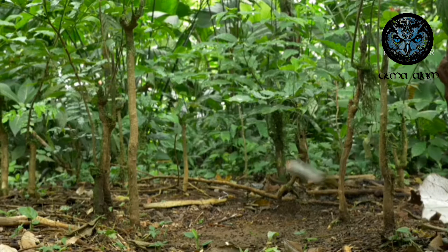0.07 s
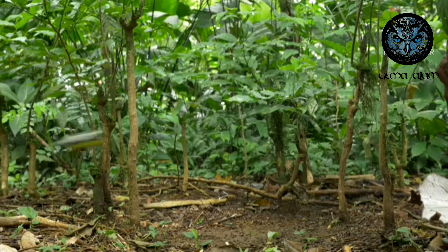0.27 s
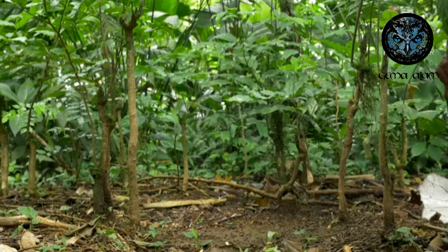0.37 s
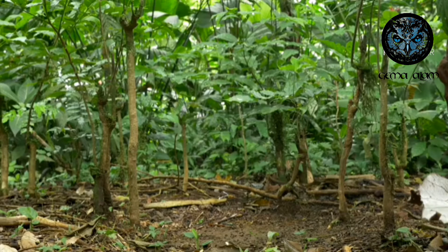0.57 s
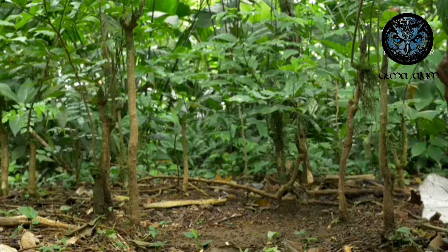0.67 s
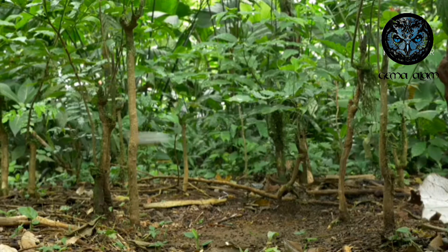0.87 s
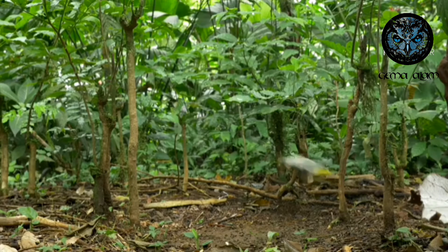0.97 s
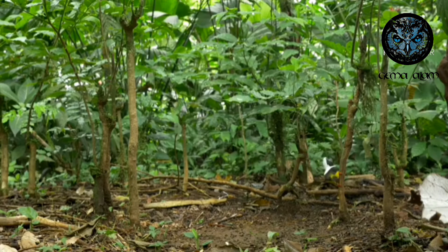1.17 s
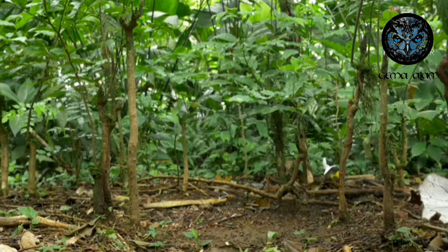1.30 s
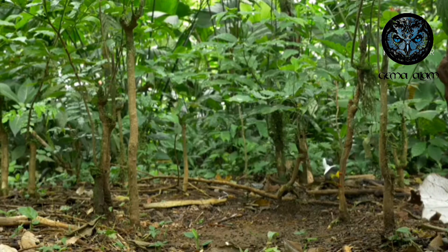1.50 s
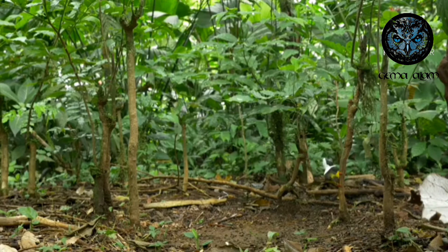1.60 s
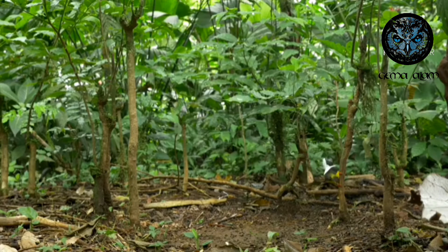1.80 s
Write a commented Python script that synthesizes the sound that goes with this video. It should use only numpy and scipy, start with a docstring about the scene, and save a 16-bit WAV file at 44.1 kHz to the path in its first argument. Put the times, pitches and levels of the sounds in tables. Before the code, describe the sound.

A small bird snaps its wings twice, chirping once between, over faint rainforest ambience.

```python
"""Low rainforest hum and leaf hiss, with an animal piping soft notes far off to the right. Close to the
stereo microphone a manakin leaps between saplings: two hard wing snaps, a rising chirp before the second,
and small scuffs as it lands. In each snap the wings clap, their shafts ring and the pushed air thumps;
trunks and leaves scatter it into a bright tail. Late on, an insect's thin tone and a soft rush swell in."""
import sys
import numpy as np
from scipy import signal
from scipy.fft import rfft, irfft, next_fast_len
from scipy.io import wavfile
from scipy.ndimage import uniform_filter1d, map_coordinates

SR = 44100
rng = np.random.default_rng(int(sys.argv[2]) if len(sys.argv) > 2 else 0)


def unload_audio(sound):
    """Save the sound as a 16-bit wav file, at the path given as the first command line argument."""
    columns = np.transpose(np.atleast_2d(sound))
    # keep every value between -1 and 1, then stretch to whole-number steps
    steps = np.round(np.clip(columns, -1, 1) * 32767)
    wavfile.write(sys.argv[1], SR, steps.astype(np.int16))


N = 81585
TIME = np.arange(N) / SR

# Stereo image of scattered sound and of the ambience. Each row: frequency in Hz, left-right likeness 0-1.
SCATTER_LIKENESS = [(300, 1), (1400, 0.18), (4000, .45), (12000, 0.42)]
AMBIENCE_LIKENESS = [(30, 1), (150, 1), (300, 1), (600, 0.8), (1200, 0.05), (10000, 0.22)]


def amp(db):
    """Decibels to gain."""
    return 10 ** (np.asarray(db) / 20)


def unit(x):
    """Scale to rms 1."""
    return x / np.sqrt(np.mean(x ** 2) + 1e-20)


def along(points, hz):
    """Interpolate (Hz, value) points on a log frequency axis."""
    freqs, values = np.transpose(points)
    return np.interp(np.log(hz + 1), np.log(freqs + 1), values)


def curves(rows):
    """One value per sample for each column after the time."""
    times, *columns = np.transpose(rows)
    return [np.interp(TIME, times, column) for column in columns]


def wobble(rate):
    """A smooth random curve, rate knots a second."""
    return map_coordinates(rng.standard_normal(N // 8), [TIME * rate], mode="mirror")


def fade(t, t60):
    """Exponential decay by 60 dB in t60 seconds."""
    return np.exp(-np.log(1000) * t / t60)


def since(start):
    """Seconds elapsed after start, zero before."""
    return np.maximum(TIME - start, 0)


def pan(x, left_db):
    """Place a sound by how much louder it is on the left than on the right."""
    return x * unit(amp(np.array([[left_db], [-left_db]]) / 2))


def filtered(x, response):
    """Filter x by a gain given as a function of Hz."""
    size = next_fast_len(N + SR // 2)
    return irfft(rfft(x, size) * response(np.fft.rfftfreq(size, 1 / SR)), size)[..., :N]


def noise(spectrum, likeness):
    """Coloured stereo noise of rms 1."""
    def mid_side_gains(hz):
        angle = np.arccos(np.clip(along(likeness, hz), -1, 1)) / 2
        return amp(along(spectrum, hz)) * [np.cos(angle), np.sin(angle)]
    mid, side = filtered(rng.standard_normal((2, N)), mid_side_gains)
    return unit(np.array([mid + side, mid - side]))


def band(hz, half_width_hz):
    """A narrow band of stereo noise of rms 1."""
    white = noise([(1000, 0), (10000, 0)], SCATTER_LIKENESS)
    return unit(filtered(white, lambda f: 1 / (1 + ((f - hz) / half_width_hz) ** 4)))


def forest(colour):
    """Impulse response of energy 1: a quick scatter from near stems, then an uneven tail."""
    # How long the forest rings. Each row: frequency in Hz, t60 in seconds.
    decay_times = [(300, 0.37), (2000, 1), (4000, 0.83), (8000, 0.67), (14000, 0.54)]
    hz, t, bins = signal.stft(noise(colour, SCATTER_LIKENESS), SR, nperseg=256)
    bins = bins * fade(t, along(decay_times, hz)[:, None])
    tail = signal.istft(bins, SR, nperseg=256)[1][:, :N]
    near_stems = 1 + amp(5) * fade(TIME, t60=0.07)
    build_up = 1 - np.exp(-TIME / 0.006)
    uneven_trunks = amp(0.4 * wobble(248))
    return unit(tail * near_stems * build_up * uneven_trunks) / np.sqrt(N)


def echo(x, colour):
    """A call as the forest returns it."""
    return signal.fftconvolve(x[None], forest(colour), axes=1)[:, :N]


def background():
    """Low distant hum, leaf hiss all around and a soft midrange rush near the end."""
    # Spectra of the three layers. Each row: frequency in Hz, relative density in dB.
    hum_colour = [(15, -49), (25, -17), (53, -19), (77, -4), (149, 1), (278, -4.5), (323, -8), (364, -7),
                  (409, -9), (1220, -16), (1400, -27), (1820, -20), (3080, -120)]
    hiss_colour = [(900, -17), (1400, 2.5), (2200, -1.5), (4200, -1.5), (6000, -7), (9500, -7),
                   (12000, -10.5), (15500, -20)]
    rush_colour = [(150, -14), (350, -3), (800, -10), (2000, -12.5), (5000, -30), (12000, -32)]
    # Drift of the ambience. Each row: time in seconds, hum level in dB, hiss level in dB.
    ambience_levels = [(0, -50.5, -55), (.2, -51, -54), (.35, -57, -54), (.65, -53, -56.5),
                       (.85, -51.5, -55), (1.15, -55.5, -56.5), (1.38, -52.5, -56), (1.58, -52, -58.5),
                       (1.85, -49.5, -54)]
    # Rise of the rush. Each row: time in seconds, level in dB.
    rush_levels = [(1.5, -85), (1.7, -53.5), (1.82, -51)]
    hum_db, hiss_db = curves(ambience_levels)
    rush_db, = curves(rush_levels)
    hum = amp(hum_db + 0.5 * wobble(11)) * noise(hum_colour, AMBIENCE_LIKENESS)
    hiss = amp(hiss_db + 0.33 * wobble(25.3)) * noise(hiss_colour, AMBIENCE_LIKENESS)
    rush = amp(rush_db) * noise(rush_colour, AMBIENCE_LIKENESS)
    return hum + hiss + rush


def insect():
    """A thin, slightly unsteady tone swells in, a little left of centre."""
    # The insect's entry. Each row: time in seconds, level in dB.
    levels = [(1.3, -107), (1.35, -71), (1.45, -75), (1.55, -60.5), (1.62, -59.5), (1.72, -60.5),
              (1.8, -56.5)]
    db, = curves(levels)
    pitch_hz = 8670 * (1 + 0.0026 * wobble(150))
    flutter_db = 4 * np.array([wobble(60), wobble(59.5)])
    tone = np.sin(2 * np.pi * np.cumsum(pitch_hz) / SR)
    return pan(amp(db + flutter_db) * tone, left_db=5)


def piping():
    """An animal far to the right: soft notes, each arching in pitch and ending low and husky."""
    # The notes. Each row: middle in seconds, level in dB, top pitch in Hz, half length in seconds.
    notes = [(.005, -48.5, 1552, 0.052), (0.151, -44, 1617, 0.057), (0.311, -55.5, 1633, .05),
             (0.457, -55, 1657, 0.066), (0.593, -53, 1623, 0.086), (0.727, -49.5, 1661, 0.056),
             (0.863, -46.5, 1669, .05), (0.988, -53, 1624, 0.0338), (1.116, -51.5, 1622, 0.0365),
             (1.233, -50.5, 1623, .04), (1.343, -49, 1607, 0.0472), (1.458, -47, 1619, .034),
             (1.566, -45, 1615, .033), (1.665, -44.5, 1606, 0.0321), (1.776, -45, 1612, .055)]
    # Flat spectrum of their echo. Each row: frequency in Hz, relative density in dB.
    echo_colour = [(500, 0), (3000, 0)]
    arch_hz, fall_hz, jitter = 45.1, 50, 0.01213
    husk_db, husk_lag_s = -8.5, 0.015
    voice, husk = np.zeros(N), band(1448, half_width_hz=49)[0]
    swell = lambda u: np.cos(np.pi * np.clip(u, -1, 1) / 2) ** 4
    for middle, db, top_hz, half_length in notes:
        u = np.clip((TIME - middle) / half_length, -1, 1)  # -1 to 1 across the note
        droop_hz = arch_hz * (2 * u) ** 2 + fall_hz * np.maximum(2 * u, 0) ** 2
        pitch_hz = top_hz * (1 + jitter * wobble(200)) - droop_hz
        tone = swell(u) * np.sin(2 * np.pi * np.cumsum(pitch_hz) / SR)
        husky_end = amp(husk_db) * swell((TIME - middle - husk_lag_s) / half_length) * husk
        voice += amp(db) * (tone + husky_end)
    return pan(voice, left_db=-39) + amp(-6) * echo(voice, echo_colour)


def scuffs():
    """As the bird lands, feet and feathers brush leaves and knock a stem."""
    # The contacts. Each row: start in seconds, level in dB, decay time in seconds, knock over brush in dB.
    contacts = [(.444, -48, .05, -20), (0.479, -51.5, 0.013, 7), (1.073, -42.5, 0.03, -22),
                (1.115, -53, 0.028, 4.5)]
    # Spectra of leaf and stem. Each row: frequency in Hz, relative density in dB.
    leaf_colour = [(1500, -6.5), (4000, -1), (9000, 2), (12000, 4), (15500, -27)]
    stem_colour = [(60, -14), (250, -11), (600, 4), (1200, -2), (2000, -8), (5000, -39)]
    out = np.zeros((2, N))
    for start, db, decay_s, knock_db in contacts:
        u = since(start) / decay_s * np.log(1000)
        envelope = amp(db + wobble(600)) * u * np.exp(1 - u)
        brush = noise(leaf_colour, SCATTER_LIKENESS)
        knock = amp(knock_db) * noise(stem_colour, AMBIENCE_LIKENESS)
        out += envelope * (brush + knock)
    return out


def chirp():
    """One rising whistle on the left, with two overtones, roughening as it sweeps."""
    # The sweep. Each row: time in seconds, pitch in Hz, level in dB, harmonics 2 and 3 in relative dB.
    sweep = [(.780, 2990, -58, -22, -8), (.785, 3040, -44, -22, -4), (.791, 3080, -37, -20, 0),
             (.796, 3190, -41, -17, -4), (.800, 3370, -38, -13, -3), (.805, 3880, -38, -12, -15),
             (.809, 4300, -30, -18, -27), (.815, 4680, -35, -18, -28), (.821, 4790, -48, -19, -28)]
    # Spectrum of its echo. Each row: frequency in Hz, relative density in dB.
    echo_colour = [(2900, -4), (3600, -0.5), (4500, -2.5), (7000, 0), (9500, 2.5), (12000, -11)]
    hz, db, second_db, third_db = curves(sweep)
    jitter = 0.0081 + 0.02 * (hz - hz.min()) / np.ptp(hz)
    phase = 2 * np.pi * np.cumsum(hz * (1 + jitter * wobble(1500))) / SR
    tone = np.sin(phase) + amp(second_db) * np.sin(2 * phase) + amp(third_db) * np.sin(3 * phase)
    sounding = (TIME > sweep[0][0]) & (TIME < sweep[-1][0])
    voice = amp(db) * tone * uniform_filter1d(1.0 * sounding, size=100)
    return pan(voice, left_db=11) + amp(-6.5) * echo(voice, echo_colour)


def shaft_ring(start, tuning):
    """The stiff feather shafts ring briefly when struck."""
    # Shaft modes. Each row: frequency in Hz before tuning, relative level in dB, t60 in seconds.
    modes = [(3650, -39, 0.021), (4450, 0, 0.0066), (4960, -2, 0.0015), (5460, -30, 0.0028),
             (7120, -27, 0.024), (8630, -10, 0.0081)]
    t = since(start)
    attack = 1 - np.exp(-t / 0.00006)
    return attack * sum(amp(db) * np.sin(2 * np.pi * tuning * hz * t) * fade(t, t60)
                        for hz, db, t60 in modes)


def air_thump(start, hz):
    """The wings push out air: a puff, a low push whose pitch sags, and a rebound as air flows back."""
    glide, sag_s = 0.47, 0.0017  # the pitch falls from 1 + glide to 1 - glide times hz
    rebound_s, rebound_width_s, low_cut_hz = 0.00267, 0.00074, 61.5
    t = since(start)
    cycles = hz * ((1 - glide) * t + 2 * glide * sag_s * (1 - np.exp(-t / sag_s)))
    push = 0.5 * np.cos(2 * np.pi * cycles) * fade(t, t60=0.022)
    puff = amp(2) * fade(t, t60=0.00068)
    rebound = amp(-9) * np.exp(-((t - rebound_s) / rebound_width_s) ** 2)
    air = (t > 0) * (push + puff + rebound)
    return filtered(air, lambda f: (1j * f / (low_cut_hz + 1j * f)) ** 2)


def wing_snaps():
    """Close by, the wings swish together and clap: shafts tick and ring, vanes buzz, the forest answers."""
    # The claps. Each row: start in seconds, level in dB, left over right in dB, thump gain in dB,
    # thump mid-glide pitch in Hz, buzz centre in Hz, buzz in relative dB, echo gain in dB,
    # tick in relative dB, shaft tuning ratio.
    claps = [(0.2236, -2, -3.5, -16.5, 306, 6760, -11, -30.5, -11.5, 1.015),
             (0.894, -3.5, 6, -14.5, 284, 9050, -15, -31, -11, .98)]
    # Spectra of the crack and its forest echo. Each row: frequency in Hz, relative density in dB.
    crack_colour = [(1500, -51), (2500, -7), (3300, 3.5), (4300, 5), (6000, -0.5), (8000, -1),
                    (10000, -1.5), (12000, -10.5), (15500, -15)]
    echo_colour = [(200, -27), (1300, -30), (2100, -12), (2700, -8), (3400, -1), (4200, 0), (5800, -5),
                   (7300, -4), (9800, -7), (12000, -15), (15500, -28)]
    # Bounces off soil and near trunks. Each row: delay in seconds, gain in dB, left over right in dB.
    paths = [(.001, -9.5, 4), (.0018, -21, 23), (.0047, -17, -8), (0.0148, -43, -3)]
    crack_rise_s, buzz_peak_s = 0.00062, 0.0014
    out = np.zeros((2, N))
    for start, db, left_db, thump_db, thump_hz, buzz_hz, buzz_db, echo_db, tick_db, tuning in claps:
        t = since(start)
        swish = amp(-13.5) * (TIME < start) * fade(np.abs(start - TIME), t60=0.013)
        burst = amp(-4.5) * fade(t, t60=0.012) * (1 - np.exp(-t / crack_rise_s))
        crack = noise(crack_colour, SCATTER_LIKENESS) * (swish + burst)
        buzz_envelope = t / buzz_peak_s * np.exp(1 - t / buzz_peak_s)
        buzz = amp(buzz_db) * band(buzz_hz, half_width_hz=1000) * buzz_envelope
        tick = amp(tick_db) * band(12100, half_width_hz=2600) * (t > 0) * fade(t, t60=0.0026)
        bounces = sum(pan(amp(gain_db) * shaft_ring(start + delay, tuning), side_db)
                      for delay, gain_db, side_db in paths)
        clap = amp(db) * (shaft_ring(start, tuning) + bounces + crack + tick)
        thump = amp(thump_db) * air_thump(start, thump_hz)
        tail = np.pad(forest(echo_colour), ((0, 0), (round(start * SR), 0)))[:, :N]
        out += pan(clap + thump, left_db) + amp(db) * buzz
        out += amp(echo_db) * np.sqrt(SR / 10) * tail
    return out


def scene():
    """The bird in front of the microphone, the forest around it."""
    return wing_snaps() + chirp() + scuffs() + piping() + insect() + background()


def record(dry):
    """The recorder rounds off the peaks of the snaps and keeps nothing above its band limit."""
    ceiling, band_limit_hz = 0.9, 15600
    rounded = dry / (1 + np.abs(dry / ceiling) ** 6) ** (1 / 6)
    return filtered(rounded, lambda hz: 1 / (1 + (hz / band_limit_hz) ** 120))


dry = scene()
out = record(dry)
unload_audio(out)
```